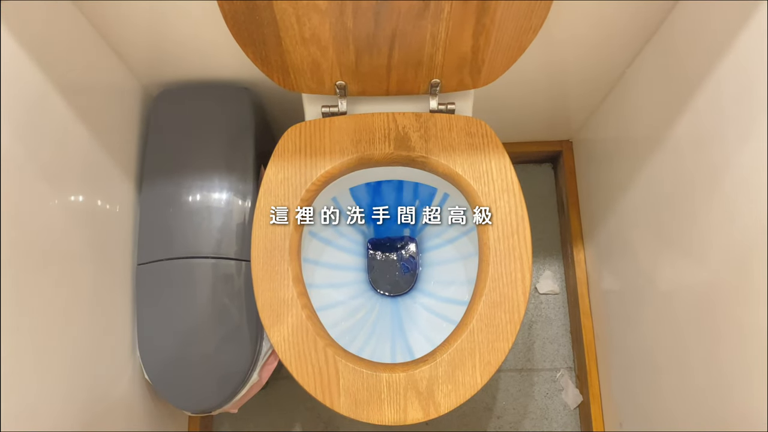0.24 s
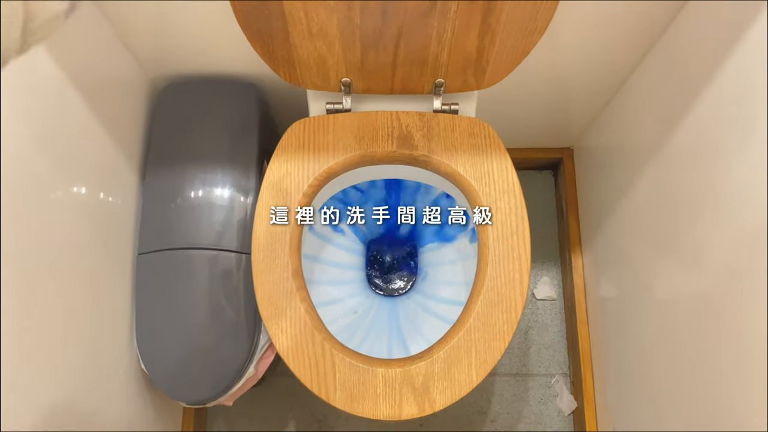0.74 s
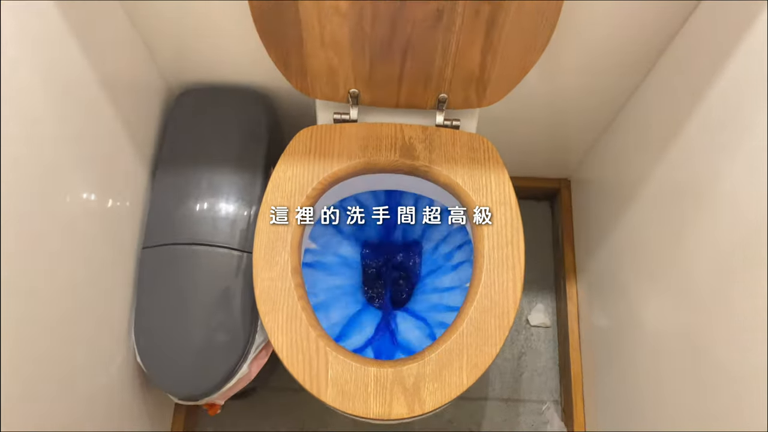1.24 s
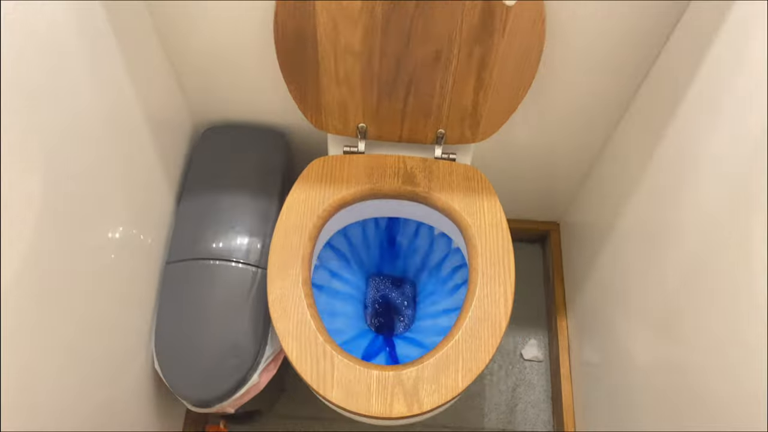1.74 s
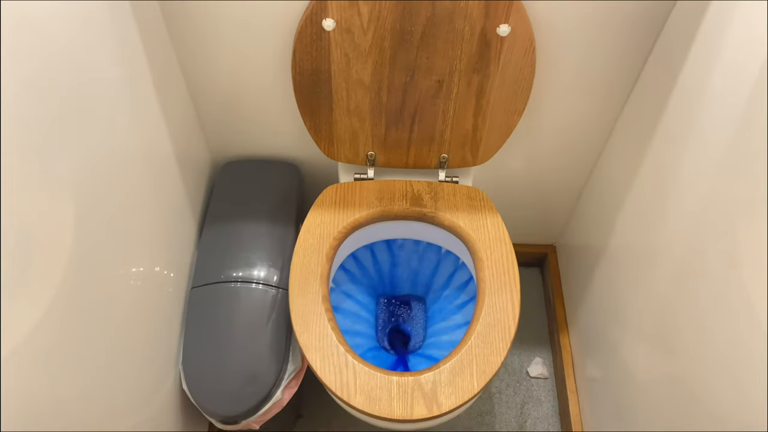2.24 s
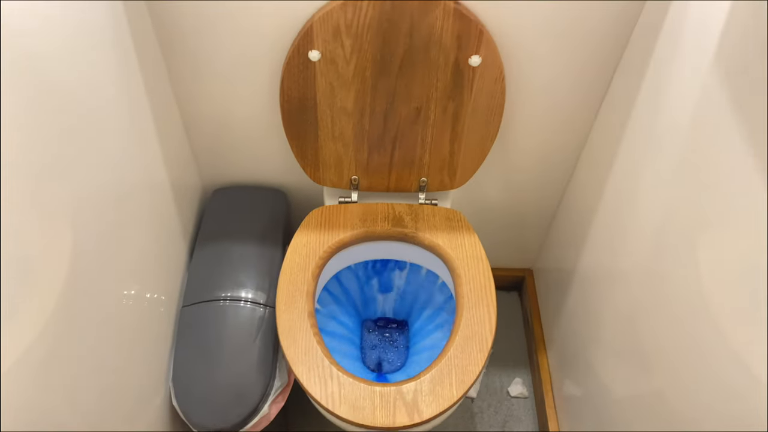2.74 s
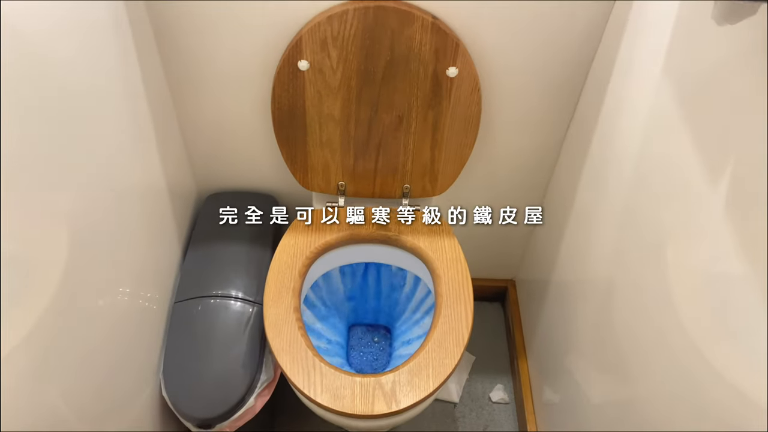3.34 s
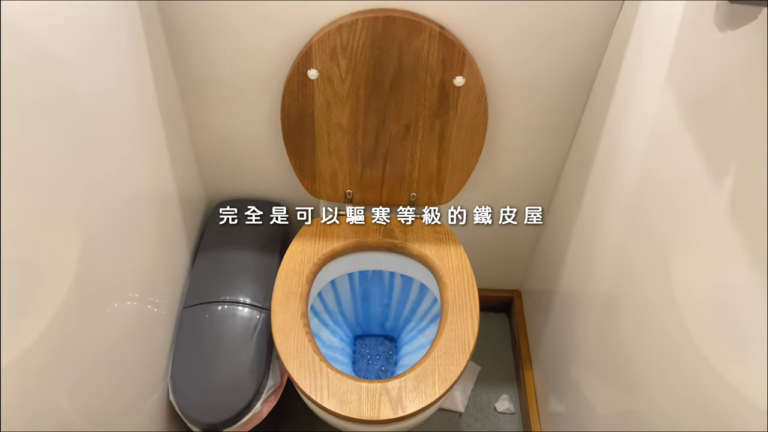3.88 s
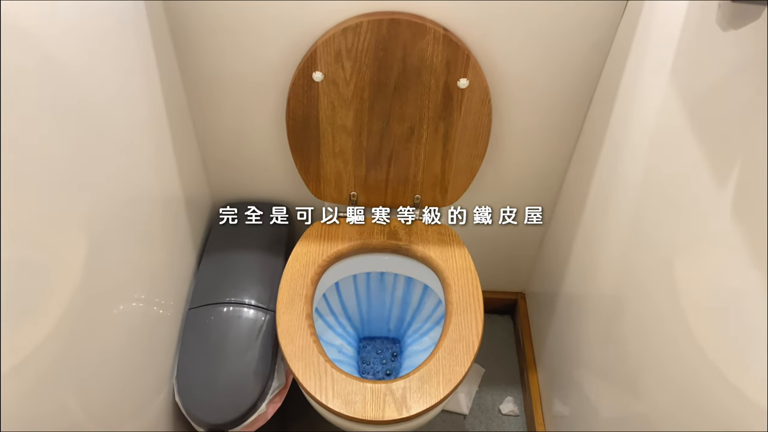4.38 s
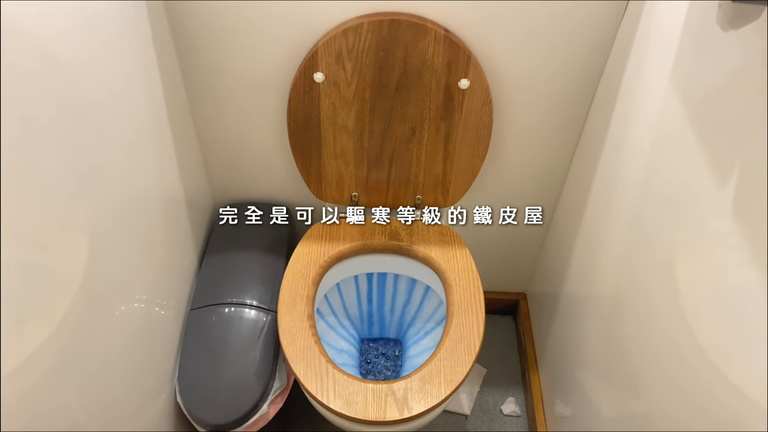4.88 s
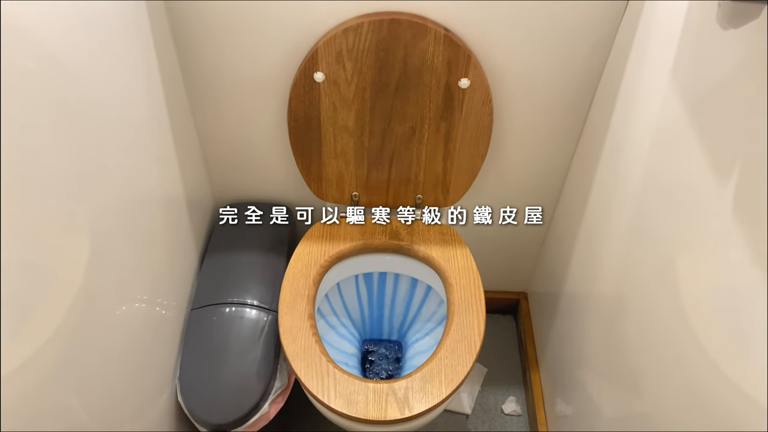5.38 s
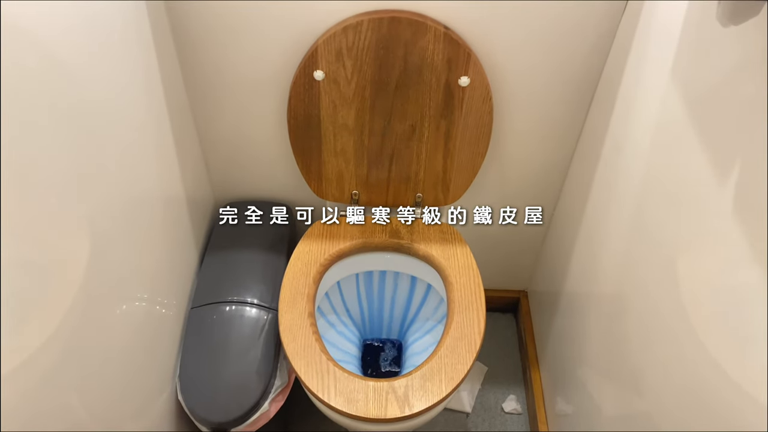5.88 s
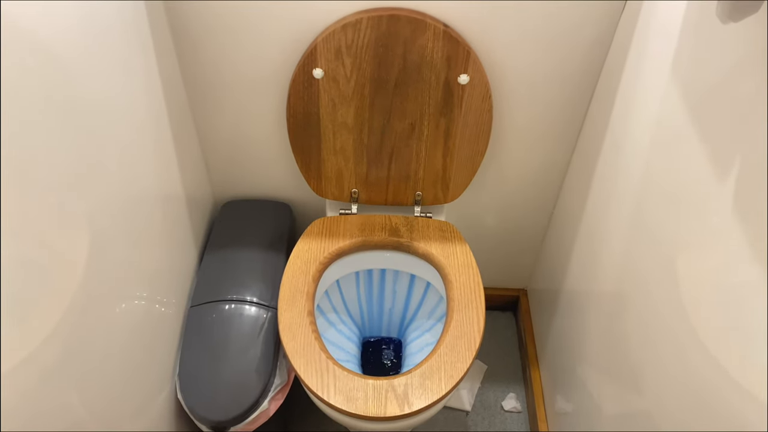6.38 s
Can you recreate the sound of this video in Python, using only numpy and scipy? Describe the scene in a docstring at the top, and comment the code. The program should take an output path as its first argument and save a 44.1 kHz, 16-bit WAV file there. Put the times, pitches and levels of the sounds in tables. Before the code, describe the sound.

A close stereo pickup in a cramped, thin-walled toilet cubicle, over low rumble and a faint trickle. From 0.13 s the lever rasps and ticks; hard, hollow clunks from lever and cistern follow between 0.29 and 0.56 s. Water spurts at about 0.55 s and swells into a bright, splashing rush that peaks near 1.05 s, with booming knocks at 0.84 and 0.9 s and small pinging bubbles. It then thins into sloshing; from 1.95 to 2.5 s low bubbles gulp with climbing pitch, and the flush dies by 2.8 s. Shoes scuff at 2.7 and 3.1 s; deep floor thuds come from 3.1 s, strongest at 3.6 to 3.75 s. A sharp scuff and softer thuds follow at 4.4 s. Afterwards a fine trickle, rumble and sparse echoing drops from 4.9 to 6.1 s remain, with a soft hiss swelling and a dull thud near 6.36 s.

```python
"""A toilet flush in a thin-walled cubicle

The lever and cistern knock (forced booth modes), water spurts (noise bursts), rushes and sloshes (coloured
random impacts, ringing bubbles) and gurgles away (bubbles of climbing pitch). Feet scuff and thud on the
hollow floor (noise bursts and modes). Bubbles blip and ping in the rush and gurgle, then single drops fall
(chirps with echoes); a trickle and low rumble persist.
"""
import sys
import numpy as np
from scipy import signal
from scipy.fft import rfft, irfft, next_fast_len
from scipy.io import wavfile

SR = 44100
rng = np.random.default_rng(int(sys.argv[2]) if len(sys.argv) > 2 else 0)


def wav_out(sig):
    """Save sig, one row per channel (or a flat mono array), as 16-bit PCM at SR to the path in sys.argv[1]."""
    wavfile.write(sys.argv[1], SR, np.round(np.clip(np.atleast_2d(sig).T, -1, 1) * 32767).astype(np.int16))


N = 291942

# course of the flush: (time [s], rush level before bowl colouring [dB], slosh level [dB])
FLUSH_LEVELS = [(.55, -67, -45), (.62, -34, -24), (0.76, -28, -26.5), (1.05, -16.5, -25.5),
                (1.17, -19.5, -38), (1.3, -21.5, -36), (1.5, -30, -34.5), (1.75, -28.5, -33.5),
                (2.2, -29.5, -32), (2.55, -37, -32.5), (2.68, -43.5, -48), (2.85, -75, -63)]
# relative spectra of the water and the rumble: (frequency [Hz], density [dB per Hz])
RUSH_SPECTRUM = [(360, -64), (600, -12), (832, -14), (1154, -12.5), (1600, -1), (2220, -0.5), (3078, 3),
                 (4270, 1), (7000, -6), (11392, -5), (15800, -11.5)]
SLOSH_SPECTRUM = [(71, -48), (120, -10.5), (262, -10), (327, -7), (397, -11), (547, -13.5), (671, -31.5),
                  (900, -19), (2200, -120)]
TRICKLE_SPECTRUM = [(500, -19), (700, 1.5), (870, -1.5), (1090, 3), (1200, -38), (1330, -5), (1800, -3.5),
                    (2435, -4), (3325, 0), (4541, -4), (6202, -10), (8471, -16.5), (11569, -12),
                    (15800, -22.5)]
RUMBLE_SPECTRUM = [(20, -20), (43, 2.5), (103, 0), (139, -5), (185, -12), (268, -7.5), (369, -19),
                   (586, -11), (725, -15), (851, -98), (1090, -20), (1210, -40), (1400, -26), (3080, -120)]
# air resonances near bowl and floor: (frequency [Hz], half-width [Hz], gain [dB])
AIR_RESONANCES = [(902, 24, 9.5), (1176, 72, 7), (1800, 44, 2.5), (1946, 30, 4.5), (2350, 48, 8),
                  (2928, 33, 9.5), (3400, 68, 1.5), (4100, 230, -2), (4800, 240, -4)]
# knocks and thumps in lever, cistern and pipe:
# (time [s], peak [dB], contact [s], centre [Hz], spread [octaves])
KNOCKS = [(.128, -16, 0.068, 308, 0.54), (.165, -15.5, 0.037, 760, 0.33), (.138, -24, 0.026, 1800, 0.062),
          (.158, -21, 0.047, 1510, 0.18), (.288, -0.5, 0.052, 255, 0.24), (.308, -4, 0.053, 610, 0.46),
          (.312, -22, 0.021, 3400, .12), (.336, -21, 0.022, 256, 0.38), (.366, -15.5, 0.028, 2190, 0.062),
          (.386, -4.5, 0.088, 248, 0.23), (.442, -12.5, 0.012, 1200, 0.09), (.444, -0.5, 0.024, 487, 0.53),
          (.47, -11, 0.061, 335, 0.062), (.538, -8.5, 0.01, 110, 1.46), (.558, -6, 0.051, 2500, 0.31),
          (.56, -7, 0.028, 322, 0.7), (.572, -16, .03, 958, .06), (.839, -3.5, 0.071, 188, 0.8),
          (.9, -5.5, 0.077, 283, 0.55), (.971, -14.5, 0.052, 60.5, 0.4), (1.0, -15, 0.05, 252, 0.56),
          (1.12, -12.5, 0.082, 294, 0.034), (1.2, -19.5, 0.14, 291, 0.073), (1.38, -14.5, 0.054, 153, 0.8),
          (1.6, -15.5, 0.027, 62, 0.5), (1.752, -15.5, 0.014, 202, 0.91), (1.962, -13.5, 0.023, 68.7, 0.57),
          (2.681, -21.5, 0.0039, 285, 0.8)]
# feet on the hollow floor: (time [s], boom peak [dB], boom centre [Hz], sole slap peak [dB], contact [s])
THUDS = [(3.12, -15, 79, -20.5, 0.11), (3.269, -16.5, 63, -44, 0.053), (3.462, -24.5, 130, -28.5, 0.05),
         (3.617, -0.5, 75, -8.5, 0.022), (3.691, -13, 60.4, -30, 0.041), (3.732, -3.5, 72.4, -18, 0.023),
         (3.799, -21, 50, -28.5, 0.13), (4.39, -12, 76.4, -22.5, 0.034), (4.461, -16, 57.5, -27, 0.059),
         (6.36, -16.5, 94.5, -18, 0.14)]
# ringing modes of the booth, nominal: (frequency [Hz], weight [dB], longest t60 [s])
BOOTH_MODES = [(55.3, -7.5, 0.86), (63.1, -10, 0.59), (79.3, -5, 0.39), (92.3, -4.5, 0.46),
               (128.5, -2, 0.34), (154.3, 5.5, 0.29), (205, 0.5, 0.041), (248, -1, 0.343),
               (288.5, 1.5, 0.13), (334.4, -5.5, 0.28), (432, -1, 0.18), (540.7, 3.5, 0.096),
               (632, 12.5, 0.11), (694, 8, 0.076), (772, 10, 0.25), (958, -26, 0.14), (1200, 6, 0.15),
               (1300, 22.5, 0.2), (1572, 20, .15), (1800, -4, .12), (2120, 5, 0.075), (2260, 4, 0.1),
               (2500, 9, 0.1), (3510, 15.5, .1)]
# rasps of the lever, spurts and splashes of water:
# (time [s], rms before envelope [dB], rise [s], t60 [s], centre [Hz], spread [octaves])
SPURTS = [(.145, -39.5, 0.0032, .1, 7000, .6), (.175, -32, 0.0037, 0.37, 2880, 0.77),
          (.29, -28, 0.023, 0.82, 3460, 0.89), (.364, -18, 0.0053, 0.17, 5840, 1.1),
          (.552, -13.5, 0.0078, 0.2, 3500, 1.2), (.66, -14.5, 0.011, 0.28, 2660, 2.1),
          (.76, -17.5, 0.0088, 0.17, 2100, 0.98), (.832, -17.5, 0.0054, 0.11, 3000, 1.8),
          (.853, -18.5, 0.0047, 0.089, 6230, 0.48), (0.926, -15.5, 0.025, 0.27, 2650, 1.03),
          (1.69, -25, 0.0047, 0.48, 4100, 2), (2.08, -25, 0.0058, 0.26, 2880, 0.26),
          (2.288, -28, 0.0099, 0.44, 5000, 2.3), (6.07, -42, 0.0058, 0.12, 8300, 0.61)]
# shoes scuffing the floor:
# (time [s], rms before envelope [dB], rise [s], t60 [s], centre [Hz], spread [octaves])
SCUFFS = [(2.674, -23, 0.013, 0.23, 4830, 0.77), (3.114, -20.5, 0.019, 0.32, 2040, 1.3),
          (3.616, -36.5, 0.0072, 0.3, 1110, 1.3), (4.366, -24, 0.0048, 0.098, 3240, 0.55),
          (4.375, -12.5, 0.007, 0.29, 2340, 0.51), (4.393, -18.5, 0.002, 0.35, 2360, 1.2)]
# big bubbles gulping in the trap: (time [s], starting pitch [Hz], nominal peak [dB], t60 [s])
GULPS = [(1.955, 272, -27, 0.11), (2.035, 289, -30, .06), (2.085, 293, -21, 0.1), (2.2, 305, -26, 0.13),
         (2.285, 306, -25, 0.071), (2.34, 310, -29, 0.096), (2.465, 318, -28, 0.05)]
# short bubble blips and pings in the rush and gurgle, then single falling drops:
# (time [s], mid-blip pitch [Hz], nominal peak [dB], t60 of the echoes [s])
BLIPS = [(.672, 2350, -17, 0.079), (.928, 2570, -12, 0.15), (.97, 1920, -18, 0.093),
         (1.01, 1540, -15, 0.14), (1.155, 1810, -17, 0.089), (1.233, 1270, -15.5, 0.18),
         (1.793, 1800, -21.5, 0.1), (2.22, 946, -28.5, 0.22), (3.274, 2200, -23, 0.2),
         (4.865, 4400, -35, .2), (5.055, 2340, -35.5, 0.19), (5.505, 3330, -30.5, .2), (5.8, 2120, -32, .2),
         (6.14, 3170, -35.5, 0.4)]
# course of the background: (time [s], level [dB])
TRICKLE_LEVEL = [(0, -44), (.25, -43), (.52, -35), (.65, -38), (1.01, -32), (1.44, -42), (2.53, -44.5),
                 (3.05, -43), (3.59, -40.5), (6.62, -40)]
RUMBLE_LEVEL = [(0, -25), (.18, -30.5), (.46, -23), (1.01, -32.5), (1.44, -31.5), (2.5, -34), (3.6, -29.5),
                (5.7, -30), (6.43, -24.5), (6.62, -25.5)]
# likeness of left and right, before the ceiling set in stereo(): (frequency [Hz], correlation [1])
LIKENESS = [(30, .999), (90, 1), (250, 1), (600, 1), (1200, 1), (2000, 1), (2800, 1), (4000, 0.23),
            (5500, 1), (8000, 1), (15000, 1)]
# phase between the two microphone ports: (frequency [Hz], lead of the right [rad])
RIGHT_LEAD = [(100, 0.07), (300, 0.21), (690, 2), (1200, 1.17), (2750, 2), (4800, 2), (5340, 7.5),
              (7300, 1.5), (10250, 0.76), (13500, -4), (15700, -3.5)]

# a last soft swell of hiss, in the columns of SPURTS
LAST_SWELL = (6.2, -37.5, 0.18, 31, 2200, 0.69)
BOOM_OCTAVES, SLAP_HZ, SLAP_OCTAVES = 0.49, 335, 0.47
# each blow detunes and weights the modes afresh; loose parts limit how many cycles they ring
MODE_STRAY, MODE_SPREAD_DB, MOST_CYCLES = .012, 2, 130
RATTLE_DB, RATTLE_PER_S = 2, 120  # grit under a sole makes the hiss stutter
GULP_CLIMB_OCT_PER_S, GULP_SWELL_S, GULP_ROUGH = 4.24, 0.032, .2
BLIP_S, BLIP_CLIMB_OCT_PER_S = .008, 26
FLUTTER_S, SCATTER_PER_S, SCATTER_DB = .0106, 500, -9  # echo between facing walls, stray reflections
LOW_CUT_HZ, CUTOFF_HZ = 27, 16500


def flush(small_bubbles):
    """Resonant filtering: the bowl colours rush and bubbles; the slosh is added uncoloured."""
    rush_db, slosh_db = in_time(FLUSH_LEVELS)
    splashes = fizz(per_s=450.0, low_hz=900.0, high_hz=5000.0, cycles=30., uneven_db=4.5, clump_db=7.0)
    rush = water(RUSH_SPECTRUM, per_s=5000., uneven_db=2.0, patchy_db=3.0, flicker_hz=19.0, in_step=0.74)
    rush = amp(rush_db) * (rush + amp(-5.5) * small_bubbles + amp(-4.5) * splashes)
    hz = np.arange(N // 2 + 1) * SR / N
    coloured = irfft(rfft(rush) * resonances(hz, plain=2.96) / 4, N)
    slosh = water(SLOSH_SPECTRUM, per_s=740.0, uneven_db=1.0, patchy_db=6.5, flicker_hz=5.5)
    return coloured + amp(slosh_db) * slosh


def water(spectrum, per_s, uneven_db, patchy_db, flicker_hz, in_step=0.027):
    """Shot noise: random uneven impacts, coloured; bands flicker partly together; rms 1."""
    sizes = amp(uneven_db * np.minimum(rng.exponential(1, (2, N)), 5)) * rng.choice([-1, 1], (2, N))
    impacts = sizes * (rng.random((2, N)) < per_s / SR)
    grains = stereo(impacts, lambda hz: amp(at_hz(spectrum, hz)))
    hz = np.arange(N // 2 + 1) * SR / N
    whole, together, out = rfft(grains), drift(flicker_hz), 0
    centres = np.geomspace(spectrum[0][0], spectrum[-1][0], 8)
    octaves = np.log2(centres[1] / centres[0]) / 2
    bells = np.array([hump(hz, centre, octaves) for centre in centres]) + 1e-30
    for bell in bells / bells.sum(axis=0):  # the bands sum to the whole
        flicker_db = patchy_db * (in_step * together + drift(flicker_hz))
        out = out + irfft(whole * bell, N) * amp(flicker_db)
    return rms_one(out)


def fizz(per_s, low_hz, high_hz, cycles, uneven_db, clump_db):
    """Bubble resonance: random clumped bursts each ring some cycles at one of 36 pitches; rms 1."""
    sizes = amp(uneven_db * np.minimum(rng.exponential(1, (2, N)), 4))
    bursts = sizes * (rng.random((2, N)) < per_s * amp(clump_db * drift(16.)) / SR)
    dealt, out = rng.integers(0, 36, (2, N)), 0
    for k, hz in enumerate(np.geomspace(low_hz, high_hz, 36)):
        # the root of the pitch evens the energy over pitch
        out = out + np.sqrt(hz) * ring(bursts * (dealt == k) + 1e-18, hz, cycles / hz)
    return rms_one(stereo(out, np.ones_like))


def resonances(hz, plain):
    """Resonance curves: air resonances stand out of a plain share."""
    return plain + sum(amp(db) / (1 + ((hz - f) / width) ** 2) for f, width, db in AIR_RESONANCES)


def knocks_and_thuds():
    """Modal excitation: knocks strike the booth; each footfall booms low and slaps higher up."""
    booms = [(s, db, contact, hz, BOOM_OCTAVES) for s, db, hz, _, contact in THUDS]
    slaps = [(s, db, contact, SLAP_HZ, SLAP_OCTAVES) for s, _, _, db, contact in THUDS]
    return blows(KNOCKS + slaps, impact=0.39) + blows(booms, impact=1.3)


def blows(table, impact):
    """Forced vibration: an impact and scratchy contact drive the booth modes near a centre pitch."""
    out, t = np.zeros((2, N)), np.arange(SR // 2) / SR
    # panels radiate little below their lowest mode
    radiation = signal.butter(3, 42, "high", fs=SR, output="sos")
    # soft soles and plastic start gently
    fade = np.minimum(t / .006, 1) * np.cos(np.pi * t) ** 2
    for s, peak_db, contact, centre_hz, octaves in table:
        force = rng.standard_normal((2, len(t))) * np.exp(-(t / contact) ** 2) + 1e-18
        force[0, :80] += impact * np.sqrt(contact * SR) * np.hanning(80) / 40  # about 2 ms
        rings = np.zeros_like(force)
        for hz, db, t60 in BOOTH_MODES:
            for off, more in rng.standard_normal((2, 2)):  # every mode is a close pair
                mode_hz = hz * (1 + MODE_STRAY * np.log2(hz / 40) / 4 * off)
                gain = amp(db + MODE_SPREAD_DB * more) * hump(hz, centre_hz, octaves)
                if gain > 1e-3:
                    rings += gain * ring(force, mode_hz, min(t60, MOST_CYCLES / hz))
        low_hz = centre_hz / 2 ** (2 * octaves + .3)  # little sounds below the struck modes
        rings = signal.sosfilt(radiation, rings)
        rings = stereo(rings, lambda hz: 1 / (1 + (low_hz / (hz + 1)) ** 4)) * fade
        add(out, s, amp(peak_db) * rings / np.abs(rings).max())
    return out


def spurts_and_scuffs():
    """Broadband excitation: spurts are sudden and broad; scuffs stir the air resonances more."""
    spurts = hisses(SPURTS + [LAST_SWELL], plain=1.46, rattle_db=RATTLE_DB / 2)
    return spurts + hisses(SCUFFS, plain=0.21, rattle_db=RATTLE_DB)


def hisses(table, plain, rattle_db):
    """Filtered noise: stuttering bursts rise, then decay exponentially, coloured by air resonances."""
    out, t = np.zeros((2, N)), np.arange(SR // 2) / SR
    for s, rms_db, rise, t60, centre_hz, octaves in table:
        noise = rng.standard_normal((2, len(t)))
        noise = stereo(noise, lambda hz: hump(hz, centre_hz, octaves) * resonances(hz, plain))
        steps = rng.standard_normal(RATTLE_PER_S)
        noise = noise * amp(rattle_db * np.interp(t * RATTLE_PER_S, np.arange(RATTLE_PER_S), steps))
        envelope = np.minimum(t / rise, 1) * amp(-60 * np.maximum(t - rise, 0) / t60)
        add(out, s, amp(rms_db) * rms_one(noise) * envelope)
    return out


def gulps():
    """Bubble resonance: pitch climbs as a bubble nears the surface; the walls smear the tone."""
    out, t = np.zeros((2, N)), np.arange(SR // 3) / SR
    for s, hz, peak_db, t60 in GULPS:
        phase = 2 * np.pi * np.cumsum(hz * 2 ** (GULP_CLIMB_OCT_PER_S * t)) / SR
        pole = np.exp(-.06 * 2 * np.pi * hz / SR)
        wobble = signal.lfilter([1], [1, -pole], rng.standard_normal((2, 2, len(t))))
        rough = GULP_ROUGH * (.5 + 1.5 * amp(-60 * t / t60))  # the onset is the roughest
        tone = np.sin(phase) * (1 + rough * rms_one(wobble[0]))
        tone = tone + np.cos(phase) * rough * rms_one(wobble[1])
        envelope = np.minimum(t / GULP_SWELL_S, 1) * amp(-60 * np.maximum(t - GULP_SWELL_S, 0) / t60)
        add(out, s, amp(peak_db) * stereo(tone * envelope, np.ones_like))
    return out


def blips_and_drops():
    """Flutter echo: a blip of rising pitch repeats between facing walls and scatters as it decays."""
    out, t = np.zeros((2, N)), np.arange(SR // 4) / SR
    blip_t = np.arange(round(BLIP_S * SR)) / SR
    for s, hz, peak_db, t60 in BLIPS:
        pitch = hz * 2 ** (BLIP_CLIMB_OCT_PER_S * (blip_t - BLIP_S / 2))
        blip = np.sin(2 * np.pi * np.cumsum(pitch) / SR) * np.hanning(len(blip_t))
        scattered = rng.random((2, len(t))) < SCATTER_PER_S / SR
        echoes = amp(SCATTER_DB) * rng.standard_normal((2, len(t))) * scattered
        echoes[0, ::round(FLUTTER_S * SR)] = 1  # the first is the blip itself
        heard = signal.fftconvolve(echoes * amp(-60 * t / t60), blip[None])
        add(out, s, amp(peak_db) * stereo(heard, np.ones_like))
    return out


def trickle_and_rumble(small_bubbles):
    """Random noise under slow level curves: a fine bubbling trickle above a low rumble."""
    (rumble_db,), (trickle_db,) = in_time(RUMBLE_LEVEL), in_time(TRICKLE_LEVEL)
    rumble = water(RUMBLE_SPECTRUM, per_s=3000., uneven_db=1.0, patchy_db=2.5, flicker_hz=3.0)
    trickle = water(TRICKLE_SPECTRUM, per_s=12000., uneven_db=1.5, patchy_db=3.0, flicker_hz=12.7)
    return amp(rumble_db) * rumble + amp(trickle_db) * (trickle + amp(-8.0) * small_bubbles)


def ring(force, hz, t60):
    """Damped oscillator: a unit click sets a decaying sine of nominal height 1 ringing."""
    r, w = amp(-60 / (t60 * SR)), 2 * np.pi * hz / SR
    return signal.lfilter([0, np.sin(w)], [1, -2 * r * np.cos(w), r * r], force)


def stereo(pair, gain):
    """Partial coherence: mid and side signals mix to left and right; gain is a function of Hz."""
    size = next_fast_len(pair.shape[1])
    hz = np.arange(size // 2 + 1) * SR / size
    mid, side = rfft(pair, size) * gain(hz)
    # reflections never match fully above the bass
    ceiling = np.where(hz > 400, np.where(hz > 5000, .88, .6), 1)
    alike = np.clip(at_hz(LIKENESS, hz), -1, ceiling)
    both = np.sqrt(1 + alike) * mid + np.sqrt(1 - alike) * side * [[1], [-1]]
    return irfft(both, size)[:, :pair.shape[1]]


def drift(rate_hz):
    """Low-passed noise: slow chance of spread 1, drawn at every 40th sample."""
    r = np.exp(-80 * np.pi * rate_hz / SR)
    slow = signal.lfilter([1], [1, -2 * r, r * r], rng.standard_normal(N // 40 + 2002))[2000:]
    return np.interp(np.arange(N) / 40, np.arange(len(slow)), rms_one(slow))


def amp(db):
    """Decibel law: level to amplitude gain."""
    return 10 ** (np.asarray(db) / 20)


def rms_one(x):
    """Normalisation of power: scale to rms 1."""
    return x / np.sqrt(np.mean(x ** 2) + 1e-20)


def in_time(rows):
    """Linear interpolation: columns of a curve at every sample; the ends are held."""
    s, *columns = np.transpose(rows)
    return [np.interp(np.arange(N) / SR, s, c) for c in columns]


def at_hz(points, hz):
    """Logarithmic pitch scale: interpolate a table on a log-frequency axis."""
    table_hz, values = np.array(points).T
    return np.interp(np.log(hz + 1), np.log(table_hz), values)


def hump(hz, centre_hz, octaves):
    """Gaussian band: a bell on a log-frequency axis, top 1."""
    return np.exp(-.5 * (np.log2((hz + 1) / centre_hz) / octaves) ** 2)


def add(out, s, piece):
    """Superposition: mix a piece in at time s."""
    i = round(s * SR)
    out[..., i:i + piece.shape[-1]] += piece[..., :N - i]


def scene():
    """Superposition of the flush, the events and the background."""
    small_bubbles = fizz(per_s=700., low_hz=1089.6, high_hz=5202, cycles=140.0, uneven_db=4.0, clump_db=5.0)
    events = knocks_and_thuds() + spurts_and_scuffs() + gulps() + blips_and_drops()
    return flush(small_bubbles) + events + trickle_and_rumble(small_bubbles)


def record(dry):
    """Transducer response: ports shift in phase, deep bass is lost, peaks are rounded, the top is cut."""
    hz = np.arange(N // 2 + 1) * SR / N
    turn = np.exp(.5j * at_hz(RIGHT_LEAD, hz) * [[-1], [1]])
    low_cut = signal.butter(2, LOW_CUT_HZ, "high", fs=SR, output="sos")
    ports = signal.sosfilt(low_cut, irfft(rfft(dry) * turn, N))
    rounded = 1.3 * np.tanh(ports / 1.3)
    return signal.sosfilt(signal.cheby2(12, 70, CUTOFF_HZ, fs=SR, output="sos"), rounded)


dry = scene()
out = record(dry)
wav_out(out)
```